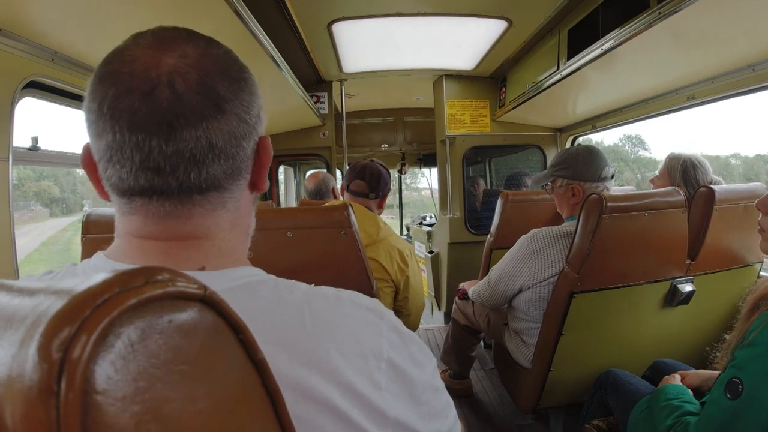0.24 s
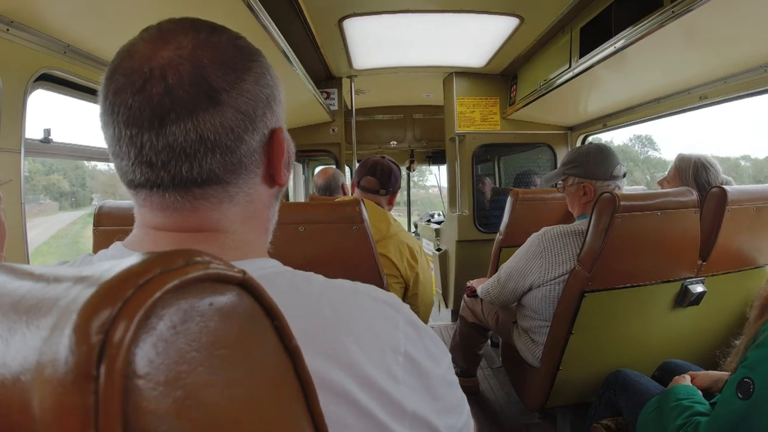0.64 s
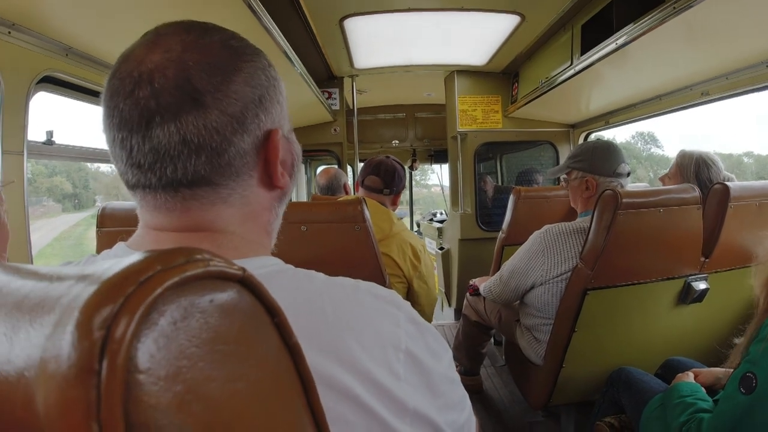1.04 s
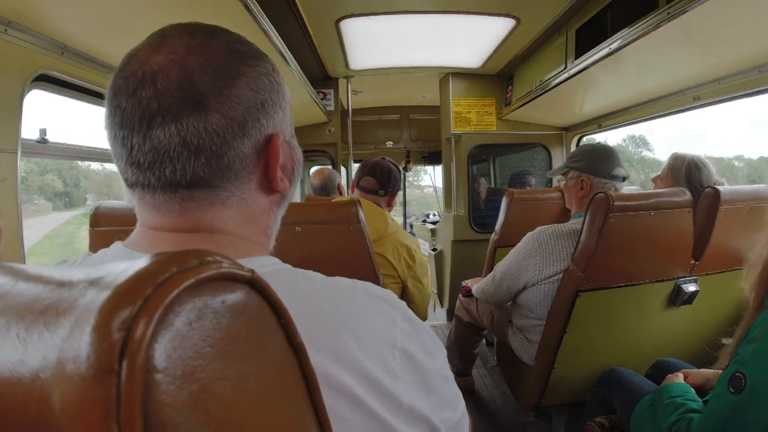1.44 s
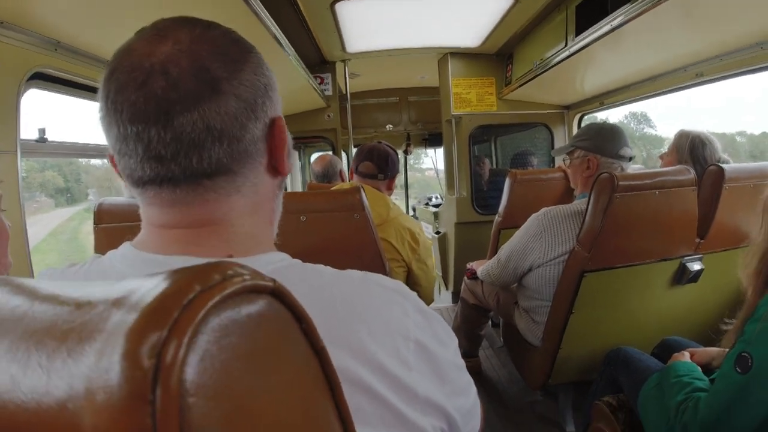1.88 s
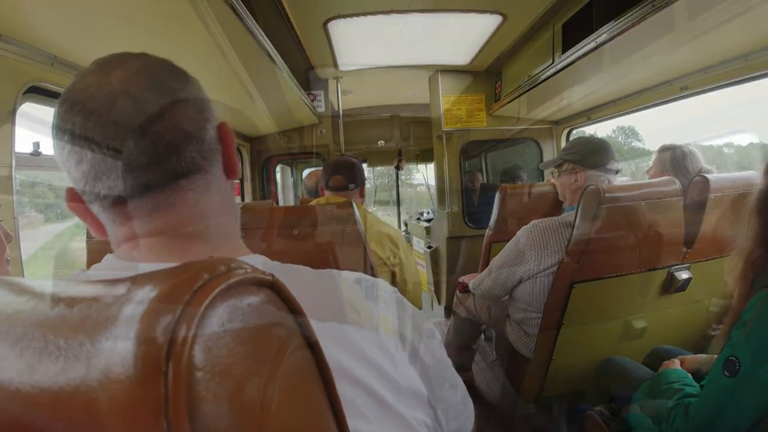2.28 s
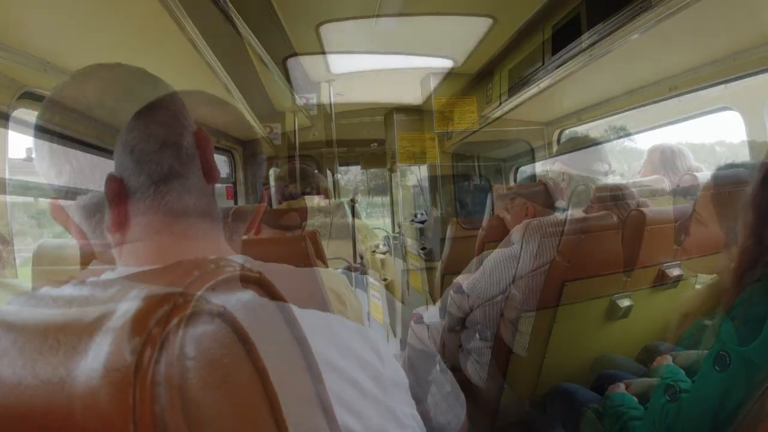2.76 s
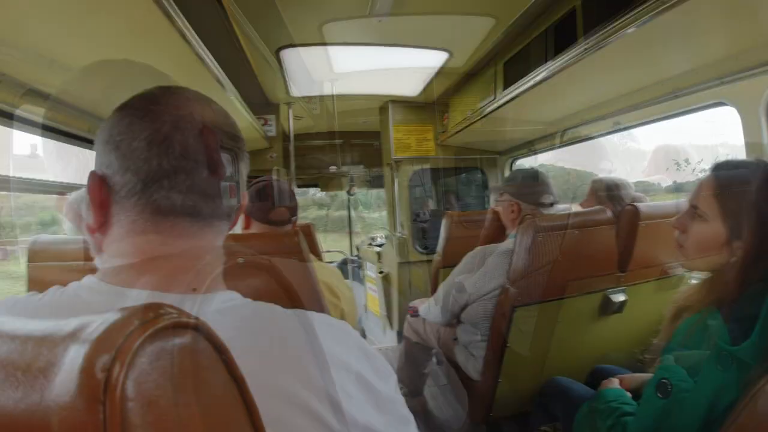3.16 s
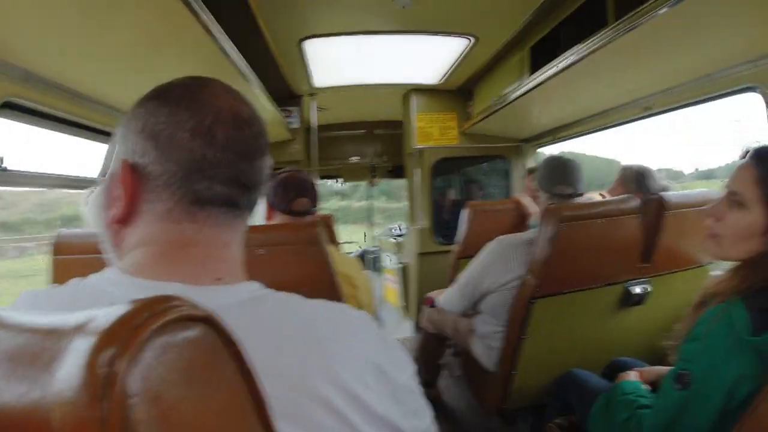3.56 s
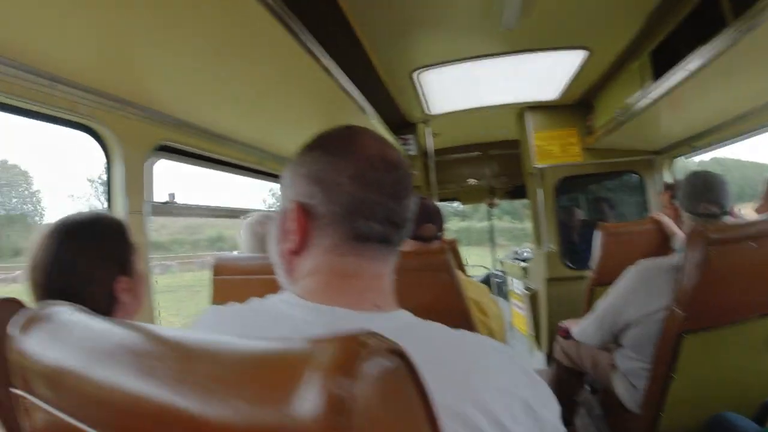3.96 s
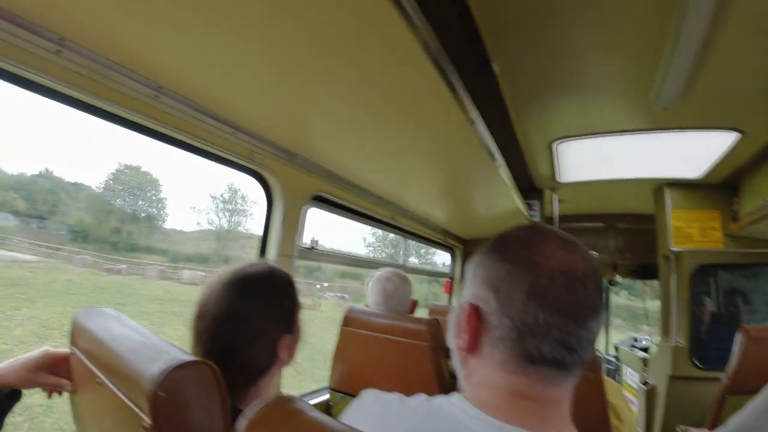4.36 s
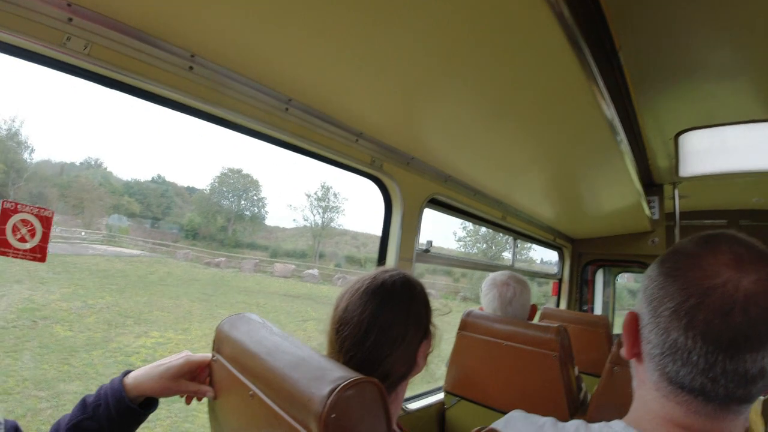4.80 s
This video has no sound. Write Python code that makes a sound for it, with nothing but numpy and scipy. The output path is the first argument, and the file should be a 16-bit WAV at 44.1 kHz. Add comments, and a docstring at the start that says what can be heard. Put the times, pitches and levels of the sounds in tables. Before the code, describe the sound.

An old bus engine hums and throbs inside the passenger cabin, over road rumble, booming panels and a faint gear whine. One jolt brings a short metallic rattle. About halfway, the throbbing fades into a slower ride with a louder, wavering low drone and a cluster of bright ticks. The drone dies away and the rumble carries on. The microphone is among the seats.

```python
"""An old bus, heard from inside: the engine booms and throbs at speed, then the sound crossfades into a
slower ride where a gear drone swells and sinks. Road shake rumbles in the floor and booms in the panels.
Tyres, shafts and draught roar and rush; at speed, much of the sound dips once per wheel turn.
A trim strip jingles, a loose fitting ticks and rings, and a hand rail clanks."""
import sys
import numpy as np
from scipy import signal
from scipy.fft import rfft, irfft, next_fast_len
from scipy.io import wavfile
from scipy.ndimage import uniform_filter1d, map_coordinates

SR = 44100
rng = np.random.default_rng(int(sys.argv[2]) if len(sys.argv) > 2 else 0)


def waveform_to_disk(signal):
    """Save audio, clipped to [-1, 1], as 16-bit WAV at the path in sys.argv[1]."""
    frames = np.transpose(np.atleast_2d(signal))
    scaled = np.clip(frames, -1, 1) * 32767
    samples = np.round(scaled).astype(np.int16)
    wavfile.write(sys.argv[1], SR, samples)


N = 221955
TIME = np.arange(N) / SR


def amp(db):
    """Decibels to linear gain."""
    return 10 ** (np.asarray(db) / 20)

def unit(x):
    """Normalise to rms 1."""
    return x / np.sqrt(np.mean(x ** 2) + 1e-20)

def along(points, hz):
    """Read (f, value) breakpoints on a log frequency axis."""
    f, values = np.transpose(points)
    return np.interp(np.log(hz + 1), np.log(f + 1), values)

def colour(spectrum):
    """An EQ curve from (f/Hz, level/dB) breakpoints."""
    return lambda hz: amp(along(spectrum, hz))

def curves(rows):
    """One automation lane for each column after the time."""
    times, *columns = np.transpose(rows)
    return [np.interp(TIME, times, column) for column in columns]

def window(start, end):
    """A gate with 80 ms fades."""
    return np.clip(np.minimum(TIME - start, end - TIME) / .08, 0, 1)

def wobble(rate):
    """A smooth random LFO, rate points a second."""
    return map_coordinates(rng.standard_normal(int(N * rate / SR) + 4), [TIME * rate])

def wheel_dips(first_s, sharpness, turn_s=0.2918):
    """Ducking LFO: 1 once per wheel turn, 0 halfway between."""
    return abs(np.cos(np.pi * (TIME - first_s) / turn_s)) ** (2 * sharpness)

def filtered(x, response):
    """Apply a complex frequency response."""
    size = next_fast_len(N + SR // 2)
    return irfft(rfft(x, size) * response(np.fft.rfftfreq(size, 1 / SR)), size)[..., :N]

# Phase of the left channel against the right: f/Hz, lead/rad
LEFT_LEAD = [(0, 0), (90, -.12), (900, -.12), (1300, -.3), (2700, -1.3), (4400, -3.2), (5700, -4.8),
             (7000, -6.2), (16000, -6.3)]
SIDES = np.array([[.5], [-.5]])
def stereo(x):
    """Place a sound by phase alone, half the shift on each side."""
    return filtered(x, lambda hz: np.exp(1j * np.interp(hz, *np.transpose(LEFT_LEAD)) * SIDES))

# Stereo image of the noise beds: f/Hz, left-right correlation
CORRELATION = [(60, 0.995), (240, 0.985), (480, 0.94), (800, 0.94), (1100, .82), (1700, 0.58), (2400, .4),
               (3600, .15), (4400, .3), (7500, 0.14), (15000, .3)]
def noise(eq, patchy_db):
    """A stereo noise bed of rms 1, its gain mottled over time and frequency."""
    spectra = signal.stft(rng.standard_normal((2, N)), nperseg=512)[2]
    patches = uniform_filter1d(rng.standard_normal(spectra.shape[1:]), 6, 0)
    patches = unit(uniform_filter1d(patches, 10, 1))
    pair = signal.istft(spectra * amp(patchy_db * patches), nperseg=512)[1][:, :N]
    spread = lambda hz: np.arccos(along(CORRELATION, hz)) / 2
    mid, side = filtered(pair, lambda hz: eq(hz) * [np.cos(spread(hz)), np.sin(spread(hz))])
    return unit(stereo(np.array([mid + side, mid - side])))

def tone(hz, db, waver_hz, flutter_db):
    """A sine with unsteady pitch and level."""
    phase = 2 * np.pi * np.cumsum(hz + waver_hz * wobble(25)) / SR + rng.uniform(0, 2 * np.pi)
    return np.sqrt(2) * amp(db + flutter_db * wobble(30)) * np.sin(phase)

# The fast-running sound crossfades into a slower ride: t/s, power share of the slow layer
DISSOLVE = [(2.2, 0.0053), (3.4, 0.97)]
def crossfade(fast, slow):
    """Equal-power fade from the fast-running layer to the slow one."""
    share, = curves(DISSOLVE)
    return np.sqrt(1 - share) * fast + np.sqrt(share) * slow

# Rows: shaft shake, engine firing, shaft 4th order, exhaust bed, firing 4th order, a hum between
# orders, firing 7th order, transmission bed, gear mesh overtone.
# f/Hz, level/dB, first dip/s, dip depth/dB, dip sharpness, waver/Hz, flutter/dB
DRIVETRAIN_TONES = [(19.8, -27.5, 0.02, 12.5, 3.9, 0.67, 3), (43.9, -26.5, .22, 13, 6.9, 2.6, 1),
                    (81.3, -43.5, 0.047, 5, 1.5, 3.5, 1), (137.85, -37, 0.1, 2.5, 1.5, 1.8, 1),
                    (182.8, -37, 0.068, 2.5, 1.3, 2.76, 3.5), (214.9, -41.5, 0.11, 4.5, 1.5, 3, 4),
                    (300, -42.5, 0.14, 0.5, 1.5, 3, 2.5), (352.3, -40.5, 0.17, 5, 2.1, 5.04, 4),
                    (620.3, -46.5, 0.2, -0.5, 1.7, 9, 1.5)]
def drivetrain():
    """Engine, shaft and gear tones throb with the wheels, then fade out."""
    fade, = curves([(1.85, 1), (4.03, 0)])
    return fade * sum(tone(hz, db - depth_db * wheel_dips(first_s, sharpness), waver, flutter)
                      for hz, db, first_s, depth_db, sharpness, waver, flutter in DRIVETRAIN_TONES)

# Exhaust swells: t/s, level/dB
EXHAUST_LEVEL = [(0.04, -24.5), (0.319, -37.5), (0.39, -44), (0.42, -36.5), (0.63, -39.5), (0.76, -23.5),
                 (0.9, -37.5), (1.03, -23.5), (1.18, -46), (1.22, -27.5), (1.38, -38.5), (1.659, -30),
                 (1.74, -57), (1.84, -23.5), (1.95, -62), (1.99, -33.5), (2.25, -36.5), (2.27, -67),
                 (2.31, -37.5), (3.1, -42.5)]
def exhaust_boom():
    """The exhaust booms in surges near three times the firing tone."""
    level_db, = curves(EXHAUST_LEVEL)
    return window(-1, EXHAUST_LEVEL[-1][0]) * tone(137.6, level_db, waver_hz=4, flutter_db=0.93)

# Transmission swells: t/s, level/dB
TRANSMISSION_LEVEL = [(0.03, -28.5), (0.12, -38.5), (0.41, -29), (0.55, -43.5), (0.63, -30.5), (0.73, -51),
                      (0.82, -30.5), (0.97, -26.5), (1.01, -60), (1.02, -32.5), (1.06, -52), (1.12, -28),
                      (1.3, -35.5), (1.38, -56), (1.44, -29.5), (1.63, -45), (1.729, -23.5), (1.8, -55),
                      (1.91, -28.5), (2.08, -41), (2.14, -26.5), (2.21, -57.5), (2.41, -29), (2.45, -55),
                      (2.58, -27.5), (2.7, -32), (2.76, -44.5), (2.8, -33.5), (2.99, -46.5), (3.12, -41.5),
                      (3.17, -61.5), (3.2, -45.5), (3.3, -34), (3.4, -51)]
def transmission_hum():
    """The transmission hums in uneven pulses at speed."""
    level_db, = curves(TRANSMISSION_LEVEL)
    return window(-1, TRANSMISSION_LEVEL[-1][0]) * tone(352.5, level_db, waver_hz=4.15, flutter_db=2.9)

# Body faders: t/s, floor level/dB, panel level/dB
BODY_LEVELS = [(.04, -26, -23.5), (.45, -28.5, -29.5), (.75, -28.5, -31), (.95, -26.5, -27.5),
               (1.1, -29, -30.5), (1.5, -33, -29.5), (1.84, -24.5, -28.5), (2.1, -32, -29),
               (2.44, -27, -31), (2.65, -39.5, -30.5), (2.85, -41, -37.5), (3.0, -33, -29.5),
               (3.16, -38.5, -36.5), (3.6, -34.5, -31), (4.0, -34, -34.5), (4.2, -31, -30.5),
               (4.4, -29.5, -34.5), (4.7, -31, -32.5), (5.0, -28, -31.5)]
# Floor rumble EQ: f/Hz, level/dB
FAST_RUMBLE = [(10, -45.5), (20, -10.5), (32, -15.5), (45, -4), (62, -7.5), (80, 2), (98, -7), (125, -5),
               (170, -25), (290, -120)]
SLOW_RUMBLE = [(9.4, -37.5), (16, -2), (27, -2), (48, -6), (130, -7), (170, -29), (290, -120)]
# Panel resonances: f/Hz, width/Hz, level/dB
FAST_PANELS = [(185, 38, 0.5), (217, 37, -0.5), (294.7, 64, -1.5), (332, 33, -5), (154, 34, 0.5)]
SLOW_PANELS = [(147, 53, 1), (200, 120, -1), (267, 37, -1.5), (335, 35, -0.5), (387.3, 9.6, 1)]
def body():
    """Road shake rumbles in the floor and sets the panel resonances booming."""
    def panels(modes):
        return lambda f: np.sqrt(sum(amp(2 * db) / (1 + (2 * (f - hz) / width) ** 2) ** 1.535
                                     for hz, width, db in modes))
    floor_db, panel_db = curves(BODY_LEVELS)
    rumble = crossfade(noise(colour(FAST_RUMBLE), 0.8), noise(colour(SLOW_RUMBLE), 0.6))
    swell = np.sqrt(abs(uniform_filter1d(rumble ** 2, size=SR // 25)) + 1e-3)
    rumble = unit(rumble / swell ** 0.44)  # compressed: the shaking is partly regular
    boom = crossfade(noise(panels(FAST_PANELS), 1.84), noise(panels(SLOW_PANELS), 0.34))
    return amp(floor_db) * rumble + amp(panel_db) * boom

# Running gear faders: t/s, rush level/dB, roar level/dB, hiss level/dB
RUNNING_LEVELS = [(.04, -47, -37, -60.5), (.6, -47.5, -37, -62), (1.2, -48.5, -36.5, -62),
                  (1.7, -47, -37.5, -61), (2.1, -46.5, -35.5, -64.5), (2.3, -51, -40, -59),
                  (2.7, -51, -40, -68), (3.05, -48, -43, -62.5), (3.6, -49.5, -37, -64),
                  (3.95, -52, -41.5, -62.5), (4.25, -46.5, -37, -62.5), (5.0, -48, -39.5, -62)]
# EQ of the low-mid roar, midrange rush and treble hiss: f/Hz, level/dB
FAST_ROAR = [(220, -31.5), (380, -1), (393, -9), (426, -1.5), (532, -6.5), (628, -6.5), (830, -12.5),
             (915, -21), (1000, -21.5), (1300, -44.5), (2200, -120)]
SLOW_ROAR = [(220, -24.5), (380, -6), (409, -20), (433, -4), (492, -1), (628, -9.5), (689, -10), (937, -18),
             (1000, -21.5), (1300, -47), (2200, -120)]
FAST_RUSH = [(560, -23.5), (950, -3.5), (1140, -1.5), (1210, -0.5), (1500, -3), (1600, -5.5), (1750, -5.5),
             (2000, -12), (2300, -9.5), (3300, -24), (4290, -53), (7260, -120)]
SLOW_RUSH = [(560, -40.5), (950, -7.5), (1080, 2.5), (1160, -6), (1330, -2.5), (1430, -8.5), (1770, -8.5),
             (1920, -11), (2180, -11), (3300, -24.5), (4290, -56.5), (7260, -120)]
HISS = [(1760, -31), (3000, -3), (3260, -12), (3590, -1.5), (3840, -6.5), (4500, -3.5), (5060, -11),
        (5810, -11.5), (7150, -28), (8610, -21), (10100, -26), (11200, -18.5), (13000, -35), (14100, -33),
        (15600, -52.5)]
def running_gear(roar_dip_db=5.5, rush_dip_db=9):
    """Tyres, shafts and draught: a roar and rush that throb at speed, under a flickering hiss."""
    rush_db, roar_db, hiss_db = curves(RUNNING_LEVELS) + jolts()
    throb = wheel_dips(first_s=0.16, sharpness=4.7) * (1 - curves(DISSOLVE)[0])
    roar = crossfade(noise(colour(FAST_ROAR), 2.0), noise(colour(SLOW_ROAR), 2.0))
    rush = crossfade(noise(colour(FAST_RUSH), 3.0), noise(colour(SLOW_RUSH), 2.3))
    hiss = amp(hiss_db + 2.2 * wobble(70)) * noise(colour(HISS), 2.4)
    return amp(roar_db - roar_dip_db * throb) * roar + amp(rush_db - rush_dip_db * throb) * rush + hiss

# Whine bands: f/Hz, width/Hz, relative level/dB
WHINE_BANDS = [(645, 63, 0.5), (1290, 23, -11.5), (1511, 38, -7), (980, 25, -6.5), (1138, 33, -9),
               (1396, 25, -16.5), (1774, 44, -12), (2196, 29, -16.5), (2425, 30, -19), (2700, 47, -19.5),
               (3320, 130, -22.5), (4550, 70, -29), (5600, 70, -30.5)]
def gear_whine():
    """Gears whine at speed in narrow bands of noise."""
    peaks = lambda f: sum(amp(db) / np.sqrt(width) / (1 + (2 * (f - hz) / width) ** 2)
                          for hz, width, db in WHINE_BANDS)
    return amp(-50) * crossfade(noise(peaks, patchy_db=-0.2), 0)

# Jingle bursts: t/s, level/dB, half length/s
JINGLES = [(.29, -61.5, 0.032), (0.357, -73, 0.043), (.67, -65.5, .06), (.97, -73.5, .06),
           (1.14, -65.5, 0.057), (1.4, -70, .05), (1.52, -73, .05), (1.82, -53.5, .04), (2.044, -65, 0.051),
           (2.28, -66, .05), (2.42, -64, 0.042), (2.57, -74, 0.03)]
def trim_jingle(ring_hz=3602, overtone_hz=5670, width_hz=140):
    """A trim strip chatters in two narrow bands: faint at speed, swelling in bursts."""
    peak = lambda f, hz: 1 / (1 + (2 * (f - hz) / width_hz) ** 2)
    eq = lambda f: peak(f, ring_hz) + amp(-12.5) * peak(f, overtone_hz)
    bed = amp(-68) * window(-1, 2.7)
    swells = sum(amp(db) * np.exp(-((TIME - s) / half_s) ** 2) for s, db, half_s in JINGLES)
    return (bed + swells) * amp(2.6 * wobble(60)) * noise(eq, patchy_db=2.5)

def burst(t, lo_hz, hi_hz, t60):
    """A decaying puff of band noise."""
    band = signal.butter(5, [lo_hz, hi_hz], "bandpass", fs=SR, output="sos")
    return amp(-60 * t / t60) * unit(signal.sosfilt(band, rng.standard_normal(len(t)))) / 2

# Modes of the loose fitting: f/Hz, level/dB, tail t60/s, left lead/rad
FITTING_MODES = [(2200, -11, 0.12, 2), (2610, -11, 0.1, 0.9), (3170, -13, 0.12, 1.6),
                 (3612, -1.5, 0.12, 2.5), (3870, -6.5, 0.1, 3), (4090, -1, 0.17, -2.5),
                 (4256, -2.5, 0.045, 1.2), (4800, -20.5, 0.047, 9), (5240, -11.5, 0.066, 0.4),
                 (6260, -13, 0.073, 2.5), (7000, -26, 0.045, -0.6), (7760, -30.5, .06, 1.5),
                 (8250, -22, .05, -1.5)]
def fitting_ring(t, low_db, lead_share, low_below_hz=3900):
    """Most of the ring is damped fast; a weaker tail chatters on, each mode's phase wandering."""
    drifts = .085 * np.cumsum(rng.standard_normal((len(FITTING_MODES), len(t))), axis=1)
    tail_db = -11 + 5 * map_coordinates(rng.standard_normal(40), [t * 200])
    ring = 0
    for (hz, db, t60, lead), drift in zip(FITTING_MODES, drifts):
        gain = amp(db + low_db * (hz < low_below_hz) + rng.normal(0, 2.2))
        decay = amp(-60 * t / (.3 * t60)) + amp(tail_db - 60 * t / t60)
        ring += gain * decay * np.sin(2 * np.pi * hz * t + drift + SIDES * lead_share * lead)
    return ring

# Ticks of a loose fitting; the rows at 1.783 and 3.3443 s are faint lead-ins just before loud ticks.
# t/s, level/dB, click f/Hz, rise/ms, crack trim/dB, crack top/Hz, ping f/Hz, ping trim/dB,
# ring trim/dB, low-mode trim/dB, right lag/ms, share of the modes' left lead
TICKS = [(1.783, -43, 4200, 1.5, -14, 6300, 9050, -17, -6, -4, .14, .8),
         (1.8015, -29.5, 4100, 0.95, -11.5, 6570, 9050, -28, -12.5, -9.5, .14, 0.82),
         (1.8176, -32.5, 3750, 0.59, -6, 6900, 9050, -23, -4.5, -2, .09, 0.96),
         (2.2648, -46, 3360, 0.97, -11, 6500, 14400, -34, -15.5, 0.5, .05, 0.36),
         (3.0847, -28, 4380, 0.75, -32, 7000, 9900, -47, -15.5, -17, .17, 0.52),
         (3.1051, -22.5, 4380, 0.6, -34.5, 8500, 9000, -44, -16.5, -14, .18, 0.69),
         (3.1567, -32.5, 4000, 0.65, -37, 7000, 9000, -51, -16, -4, .14, 1),
         (3.167, -38, 4150, 0.6, -31, 7000, 9000, -44, -13.5, -7.5, .15, .9),
         (3.2985, -23.5, 4110, 0.91, -16, 9800, 14400, -26.5, -16.5, -13.5, .16, 0.61),
         (3.3159, -26, 4100, 0.81, -18, 9800, 14300, -30.5, -16.5, -15.5, .16, 0.89),
         (3.3443, -46.5, 3450, 0.9, -26, 6000, 14400, -29, -2, 0, .07, 0.79),
         (3.3681, -26.5, 3770, 0.59, -21, 8500, 10340, -34, -3.5, 0.5, .07, 1),
         (3.3786, -30.5, 3900, 0.76, -21, 8450, 10340, -32, -3.5, -1, .11, 1),
         (3.386, -35.5, 4100, 0.9, -18.5, 8500, 10340, -27, -1, -3, .14, 0.98),
         (3.3972, -44.5, 4100, 0.8, -22, 8500, 10340, -25, -2.5, -3.5, .14, 1),
         (3.4242, -53, 4110, 0.9, -24, 6000, 10340, -39, -7.5, -9, .2, -.5),
         (4.7499, -41.5, 4500, 0.6, -15, 6600, 9000, -60, -10, -4, .24, .1),
         (4.7519, -39, 4150, 0.8, -21, 6600, 9000, -60, -12, -3, .25, .1),
         (4.7562, -41.5, 2400, 0.99, -30, 6000, 9000, -60, -10, 0, .25, 0.0074)]
def ticks(echo_ms=2.8, echo_db=-15):
    """Each tick or faint lead-in layers a short click, a bright crack, a thin ping and a rough ring."""
    out, t = np.zeros((2, N + SR)), np.arange(SR // 6) / SR
    for s, db, hz, rise_ms, crack_db, top_hz, ping_hz, ping_db, ring_db, low_db, lag_ms, lead in TICKS:
        rise = 1000 * t / rise_ms
        attack = (1 - np.exp(-rise)) ** 2
        click = (rise * np.exp(1 - rise)) ** 2 * np.sin(2 * np.pi * hz * t)
        click += amp(echo_db) * np.roll(click, round(echo_ms * SR / 1000))  # off the seat back
        snap = burst(t, 5300, top_hz, t60=.015)
        rattle = amp(-10.5) * burst(t, 5300, top_hz, t60=.09)
        crack = amp(crack_db + 8) * np.sqrt(attack) * (snap + rattle)
        ping = amp(ping_db + 4) * burst(t, ping_hz * .96, ping_hz * 1.04, t60=0.087)
        out[:, round(s * SR):][:, :len(t)] += amp(db + ring_db) * attack * fitting_ring(t, low_db, lead)
        for channel, start in enumerate([s, s + lag_ms / 1000]):
            scatter = amp(ring_db) * burst(t, 3380, 4500, t60=0.08)  # cabin reflections, new each side
            layers = click + crack + attack * (ping + scatter)
            out[channel, round(start * SR):][:len(t)] += amp(db) * layers
    return out[:, :N]

# Rail hits: t/s, relative level/dB, t60/s
CLANKS = [(1.806, -16, 0.08), (1.819, -18.5, 0.13), (2.847, -34, 0.18), (3.299, -39, 0.13),
          (3.372, -28.5, 0.1)]
# Rail modes: f/Hz, level/dB, share of the hit's t60
RAIL_MODES = [(977, 5, 0.69), (1024.4, 3.5, 0.76), (1304, -12, 0.9), (1790, -18.5, 0.5),
              (2080, -15.5, 0.51)]
def rail_clanks():
    """Each knock rings the hand rail with a slightly new balance; the top modes die first."""
    out, t = np.zeros(N + SR), np.arange(SR // 3) / SR
    attack = 1 - np.exp(-t / 0.0045)
    for s, db, t60 in CLANKS:
        ring = sum(amp(mode_db + rng.normal(0, 0.75) - 60 * t / (t60 * share))
                   * np.sin(2 * np.pi * hz * t) for hz, mode_db, share in RAIL_MODES)
        knock = amp(-12) * burst(t, 800, 1300, t60=0.054)
        out[round(s * SR):][:len(t)] += amp(db - 5.5) * (ring + knock) * attack
    return stereo(out[:N])

# Bumps in the road: t/s, rush gain/dB, roar gain/dB, hiss gain/dB
JOLTS = [(1.809, 14, 4.5, 10.5), (2.04, 3, 2.5, 0.5), (2.12, 4, -5, 4.5), (2.25, 1.5, -0.5, 4.5),
         (2.41, 5, 3.5, -7.5), (2.71, 5, 2.5, 0.5), (3.379, -2, 2.5, 7.5), (4.198, -2.5, 6.5, 3.5)]
def jolts(rise_s=0.0074, fall_s=0.025):
    """Bumps shake the running gear: quick dB moves on its three faders."""
    return sum(np.c_[gains_db] * np.exp(np.minimum((TIME - s) / rise_s, (s - TIME) / fall_s))
               for s, *gains_db in JOLTS)

# Drone pitch: t/s, f/Hz
DRONE_PITCH = [(2.7, 207.5), (3.8, 193.9), (4.4, 196.5)]
# Drone swells: t/s, level/dB
DRONE_LEVEL = [(2.6, -34), (2.63, -44), (2.682, -27), (2.738, -27), (2.784, -34), (2.9, -27),
               (3.006, -15.5), (3.146, -18.5), (3.238, -25.5), (3.392, -14), (3.5, -21), (3.585, -32.5),
               (3.635, -15.5), (3.692, -27.5), (3.754, -22.5), (3.8, -28.5), (3.836, -36), (3.95, -37),
               (4.062, -37), (4.34, -32.5), (4.372, -35), (4.388, -60), (4.434, -50), (4.45, -56)]
def gear_drone():
    """A gear tone swells in a cabin resonance and sinks in pitch."""
    drone = tone(*curves(DRONE_PITCH), *curves(DRONE_LEVEL), waver_hz=1.15, flutter_db=0.98)
    return window(DRONE_LEVEL[0][0], DRONE_LEVEL[-1][0]) * drone

# Short glides: start t/s, end t/s, start f/Hz, end f/Hz, start level/dB, end level/dB
GLIDES = [(3.964, 4.294, 262, 261, -46.5, -33), (4.273, 4.537, 277.3, 267, -34.5, -39),
          (4.749, 5.108, 103, 111.7, -39.5, -35.5), (4.81, 5.114, 397, 385, -45.5, -34.5)]
def rolling_tones():
    """Brief drivetrain tones come and go as the bus rolls and pulls away."""
    out = np.zeros(N)
    for start, end, from_hz, to_hz, from_db, to_db in GLIDES:
        hz, db = curves([(start, from_hz, from_db), (end, to_hz, to_db)])
        out += window(start, end) * tone(hz, db, waver_hz=1.4, flutter_db=3.1)
    return out

def scene():
    """The mix from a passenger seat."""
    tones = drivetrain() + exhaust_boom() + transmission_hum() + gear_drone() + rolling_tones()
    beds = body() + running_gear() + gear_whine()
    return stereo(tones) + beds + trim_jingle() + ticks() + rail_clanks()

def record(dry):
    """A brick-wall high cut on the mix."""
    return filtered(dry, lambda hz: hz < 15720)


dry = scene()
out = record(dry)
waveform_to_disk(out)
```